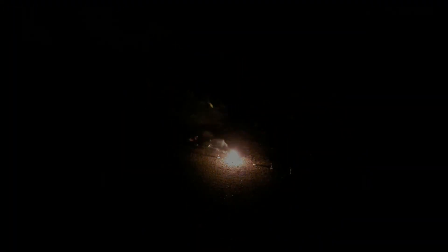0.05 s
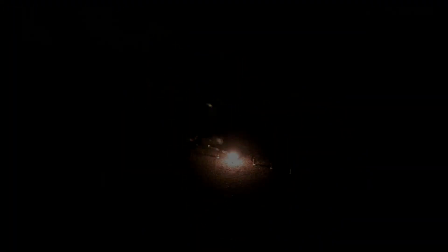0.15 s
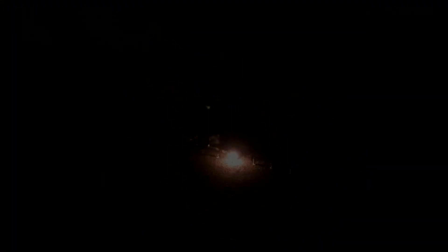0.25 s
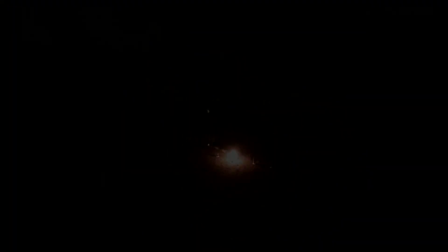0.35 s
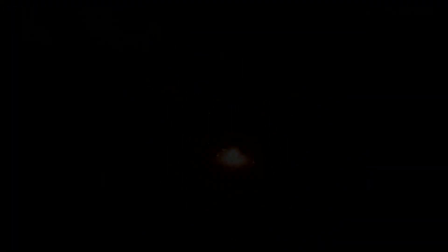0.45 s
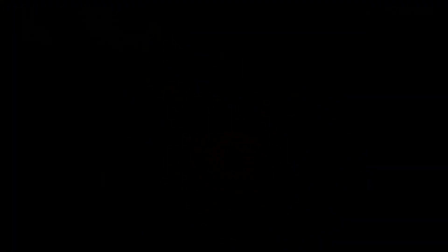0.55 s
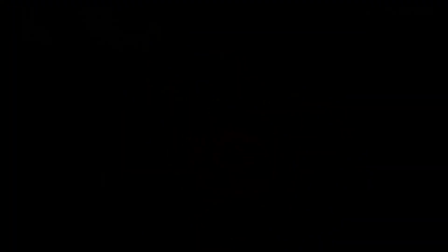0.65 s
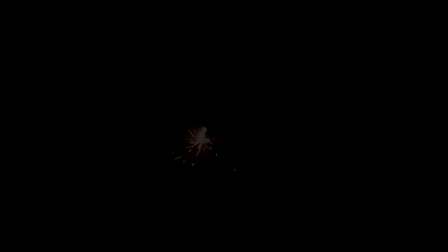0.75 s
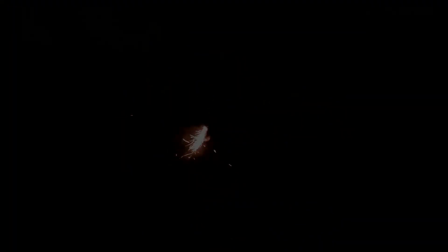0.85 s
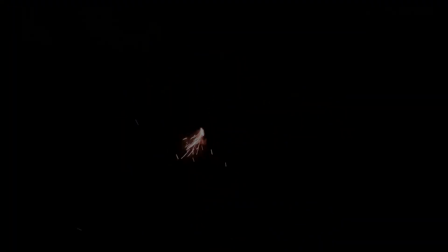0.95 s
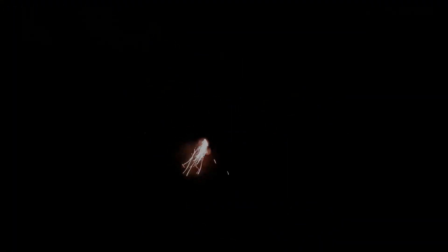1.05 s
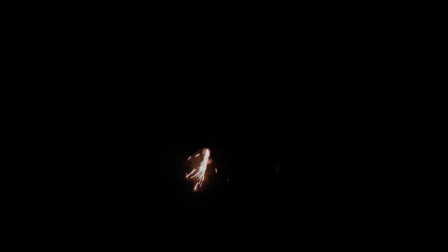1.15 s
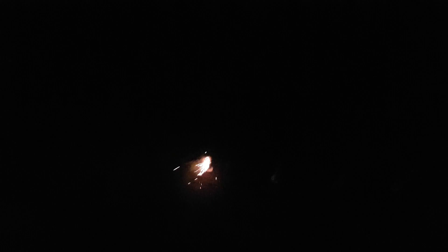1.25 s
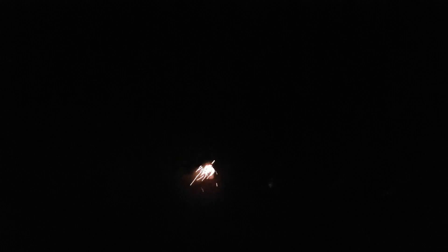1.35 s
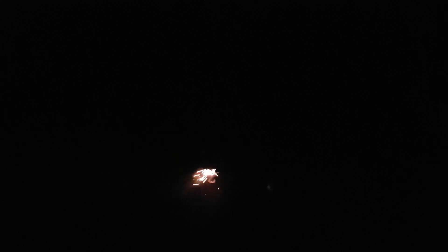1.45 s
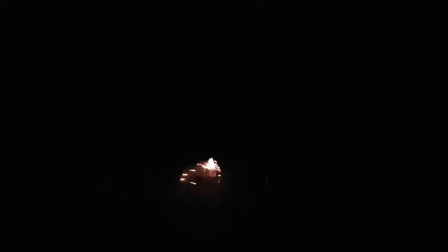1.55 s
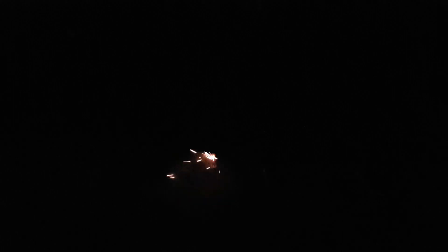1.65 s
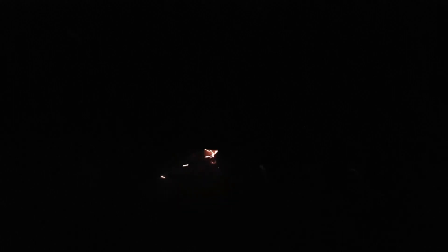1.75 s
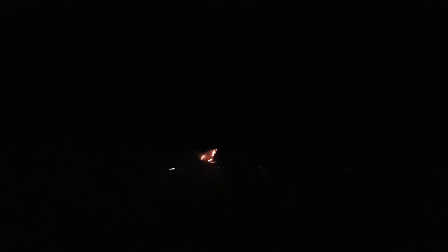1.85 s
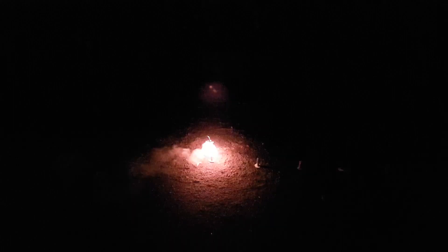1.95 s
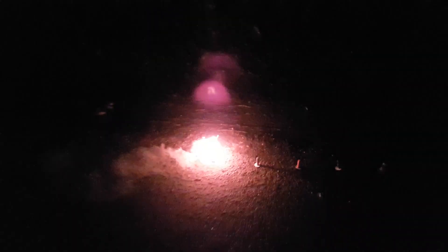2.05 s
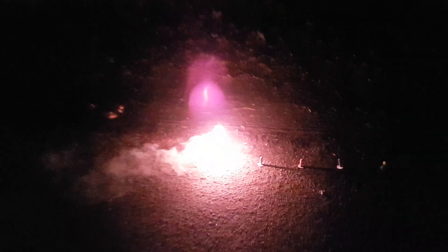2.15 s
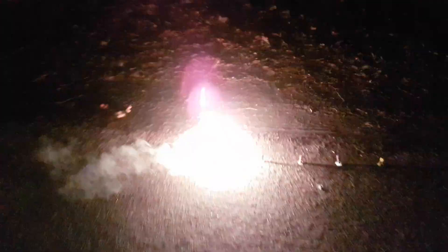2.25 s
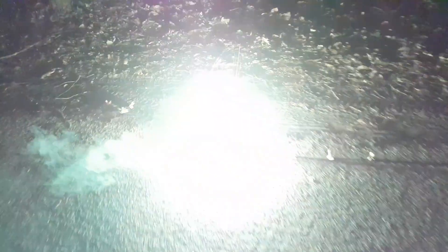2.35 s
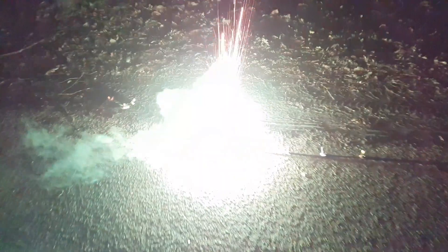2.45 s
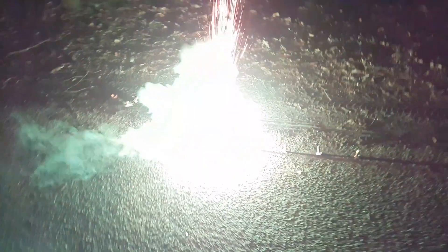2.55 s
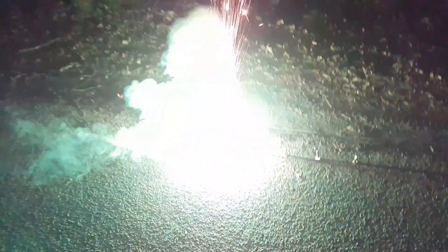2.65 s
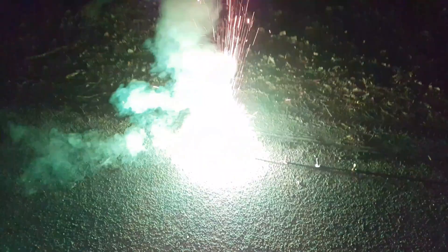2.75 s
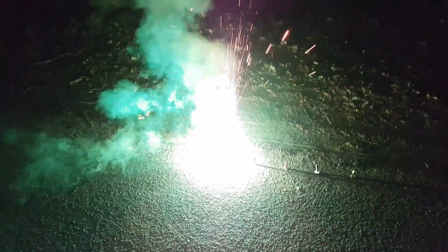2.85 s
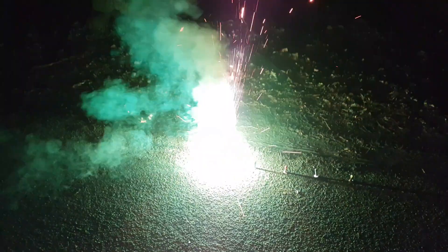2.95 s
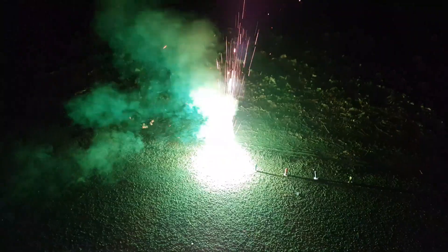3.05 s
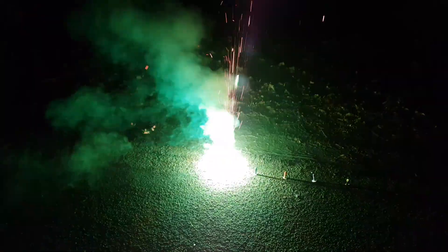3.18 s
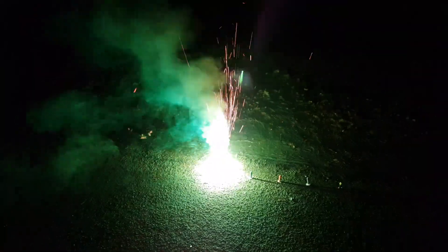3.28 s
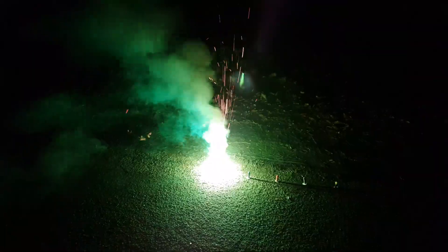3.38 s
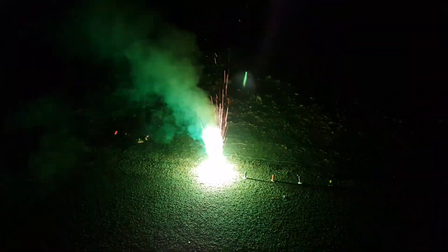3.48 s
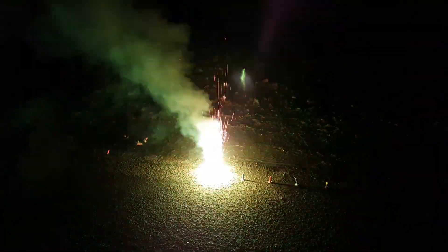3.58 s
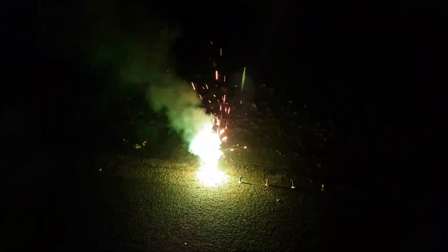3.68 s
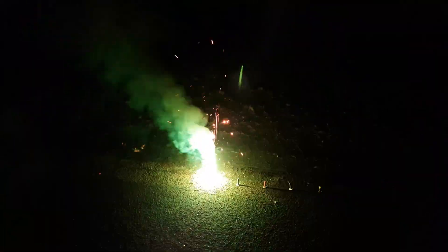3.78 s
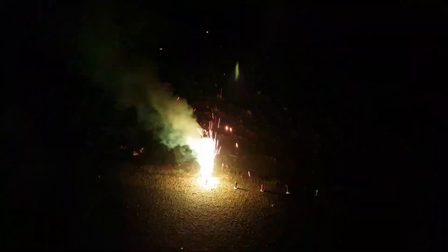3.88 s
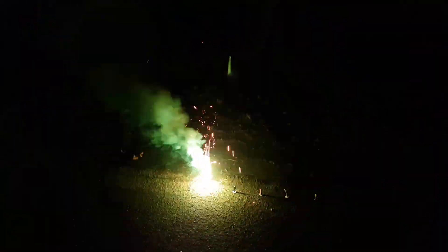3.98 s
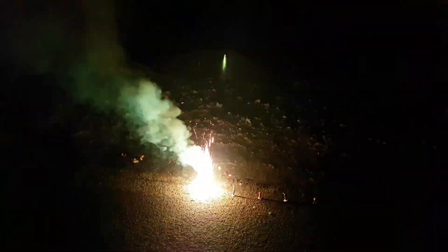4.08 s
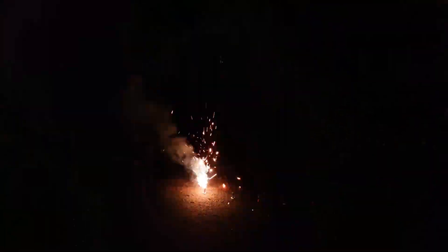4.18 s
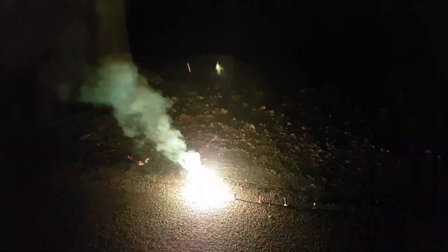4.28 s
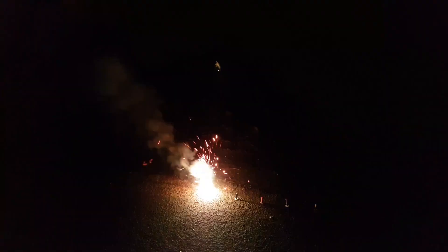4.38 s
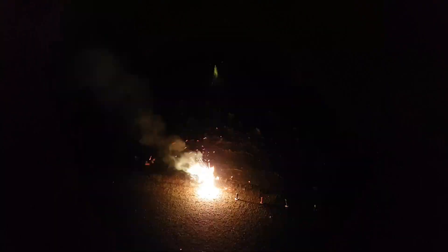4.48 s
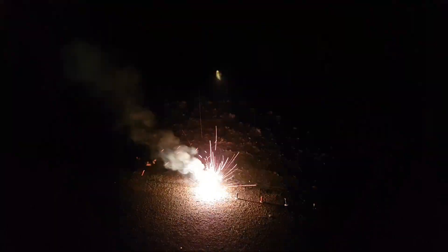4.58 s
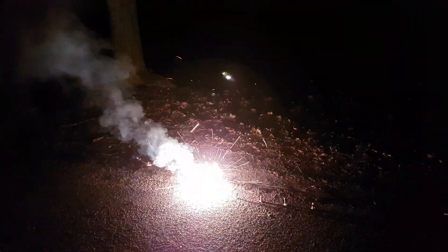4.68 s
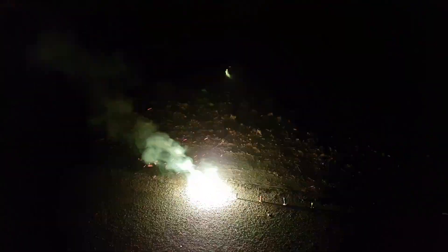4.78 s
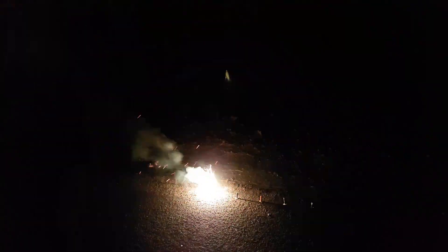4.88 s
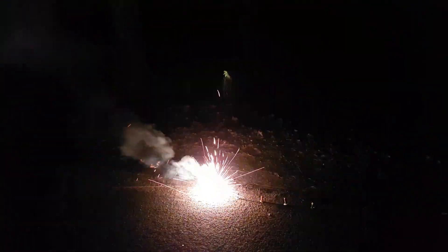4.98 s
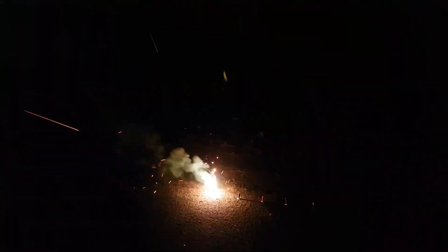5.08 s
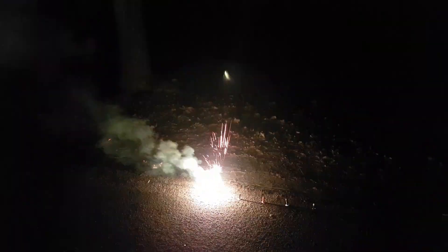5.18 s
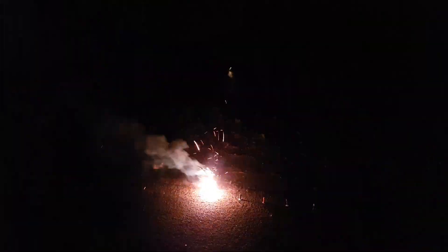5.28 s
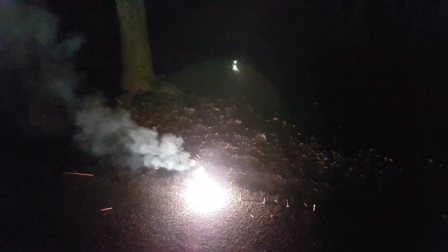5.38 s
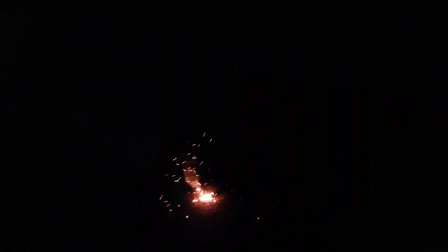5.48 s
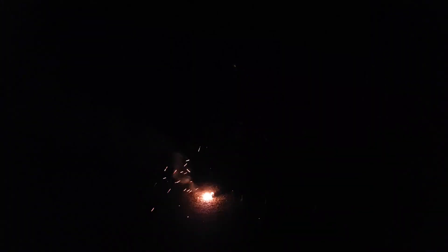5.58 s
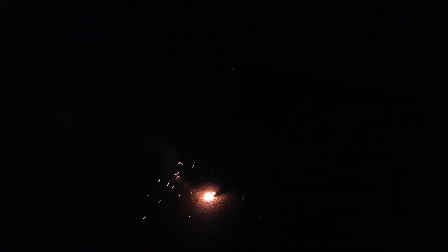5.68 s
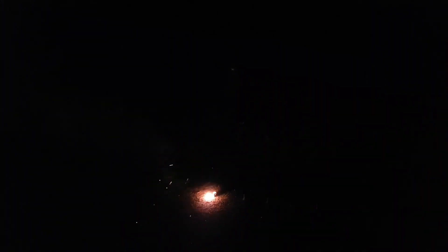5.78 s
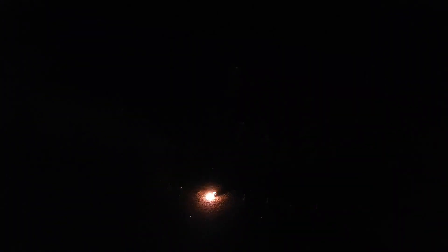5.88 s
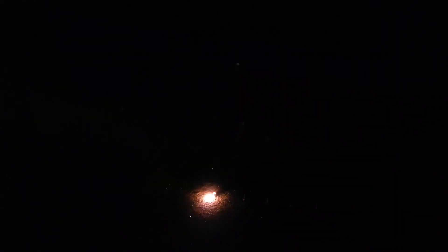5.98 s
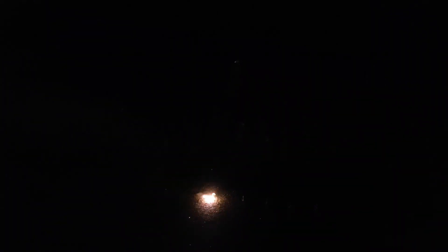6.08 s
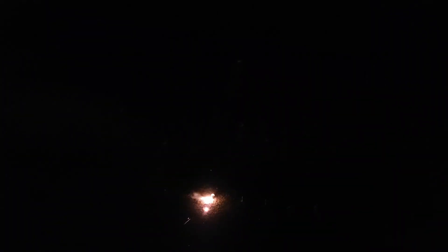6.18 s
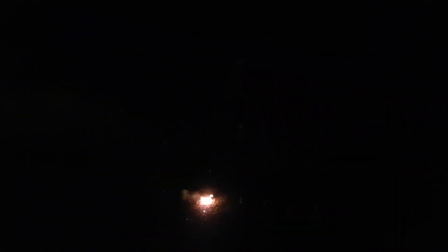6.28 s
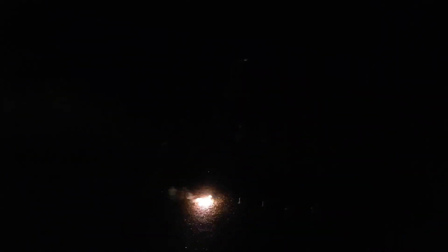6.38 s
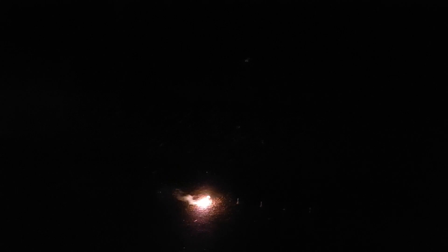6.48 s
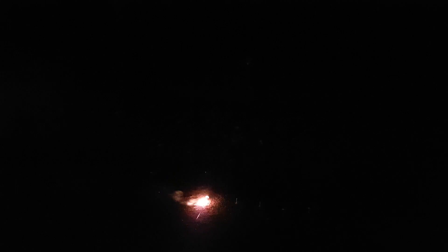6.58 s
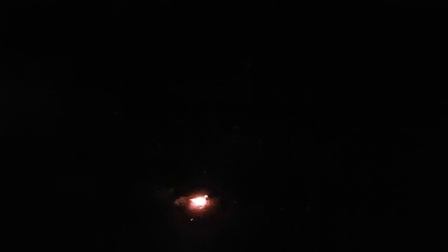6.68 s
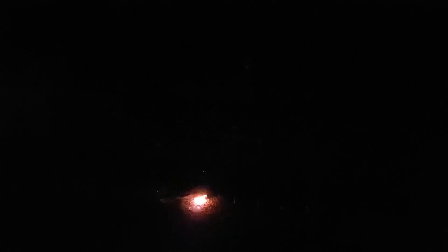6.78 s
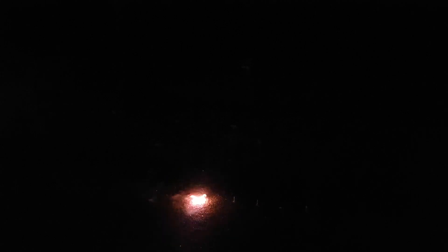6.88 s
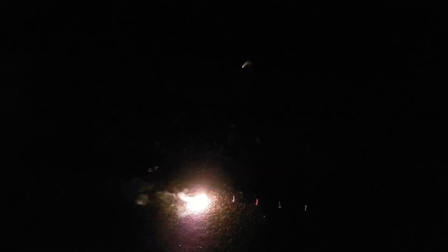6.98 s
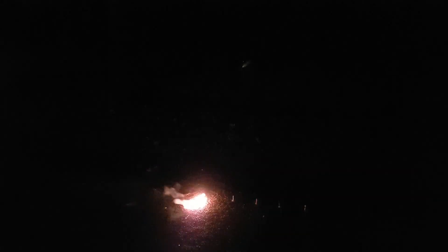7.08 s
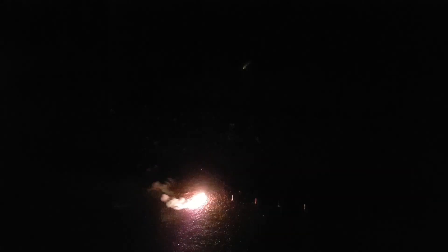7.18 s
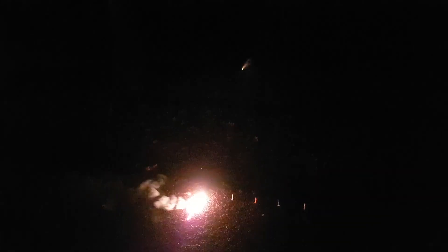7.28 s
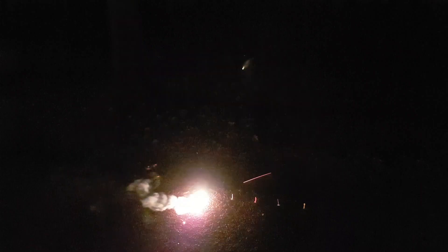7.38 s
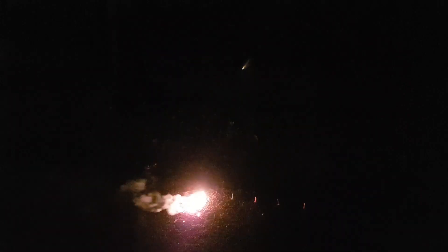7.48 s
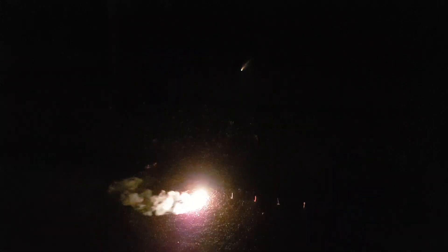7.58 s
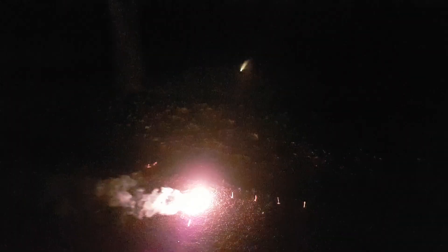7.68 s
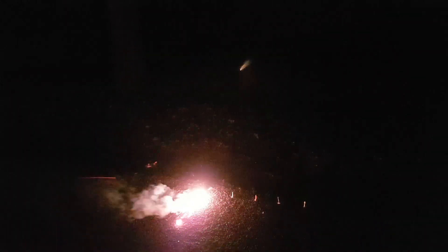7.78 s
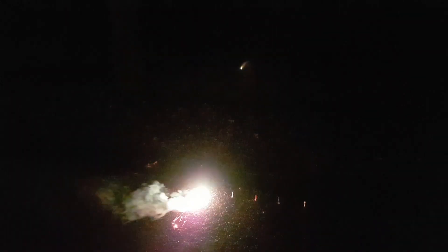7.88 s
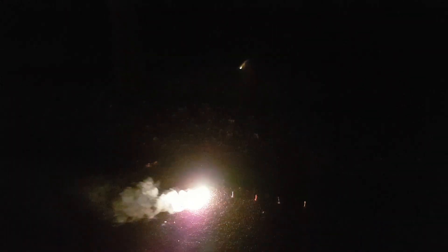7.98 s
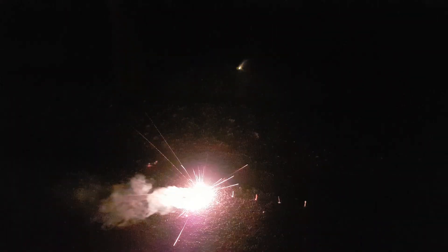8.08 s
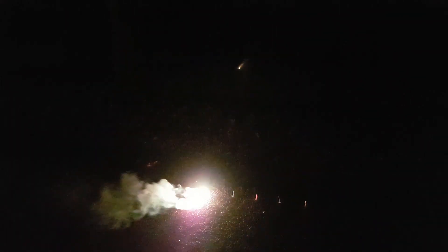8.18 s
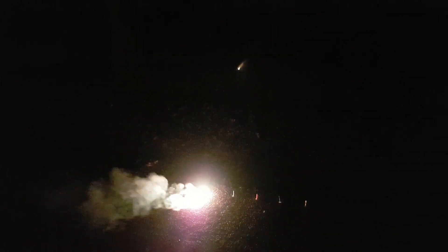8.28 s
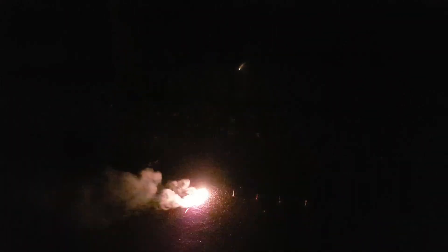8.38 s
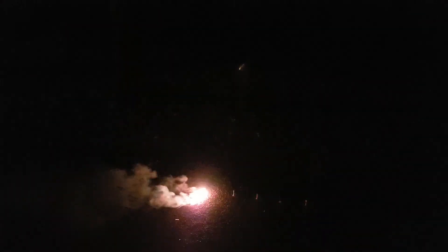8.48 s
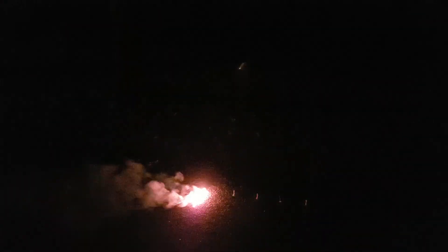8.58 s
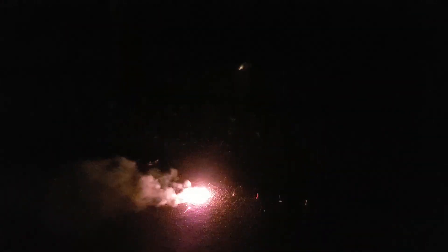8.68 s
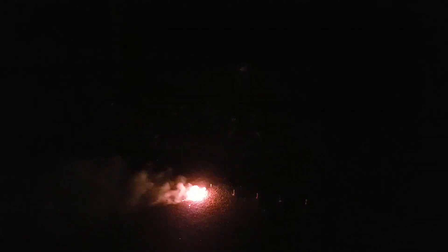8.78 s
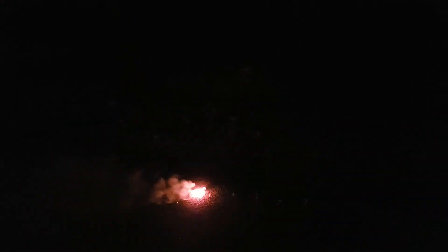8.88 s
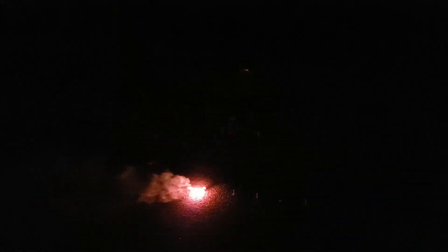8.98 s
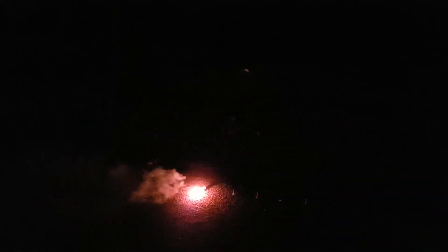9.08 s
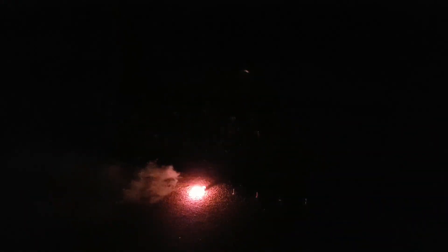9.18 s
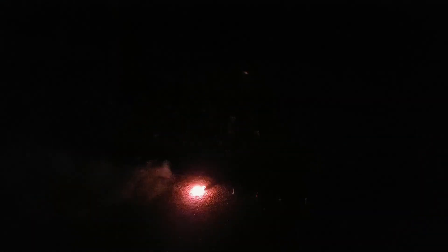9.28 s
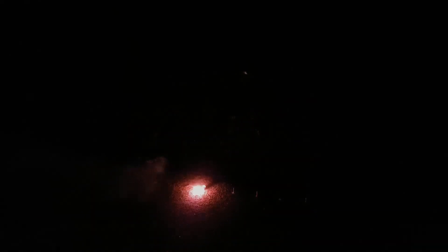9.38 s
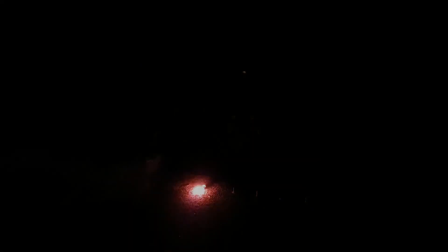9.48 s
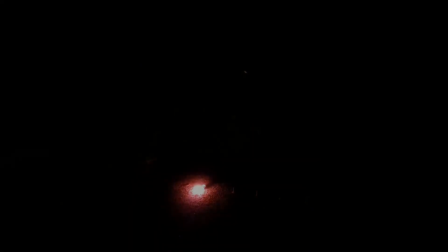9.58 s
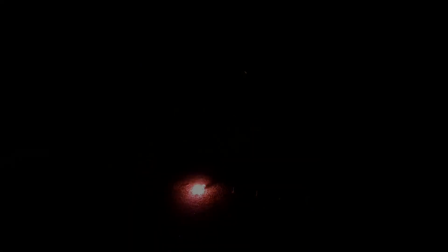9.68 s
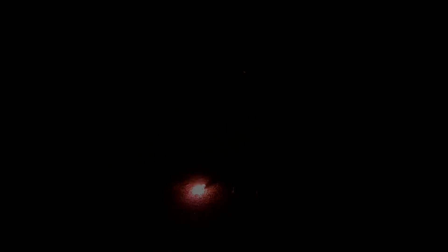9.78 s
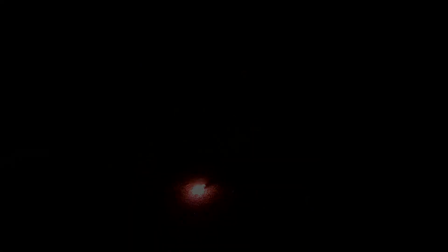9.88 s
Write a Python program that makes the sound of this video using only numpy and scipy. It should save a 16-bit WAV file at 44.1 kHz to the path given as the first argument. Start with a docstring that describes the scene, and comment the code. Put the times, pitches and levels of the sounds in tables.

```python
"""Small ground fireworks at night, a few metres from a stereo microphone pair.
Distant traffic, a noise wash with one engine note, runs throughout; a fuse fizzes over it as sputtering hiss.
Stars crack one after another, each a shock front and a push of air, and a fountain roars up as louder hiss.
Each crack comes back off the paving and a near wall and dies away in the yard as fading noise.
The fountain sinks to embers; then a second firework fizzes and cracks."""
import sys
import numpy as np
from scipy import signal
from scipy.io import wavfile
from scipy.ndimage import uniform_filter1d

SR = 44100
rng = np.random.default_rng(int(sys.argv[2]) if len(sys.argv) > 2 else 0)


def pcm_store(signal):
    """Save signal as 16-bit PCM."""
    levels = np.round(np.clip(np.atleast_2d(signal), -1, 1) * 32767)
    wavfile.write(sys.argv[1], SR, levels.astype(np.int16).T)


def volts_from_db(level):
    """Convert decibel levels to linear amplitude ratios."""
    exponent = np.asarray(level, float) / 20
    return 10 ** exponent


N = 438354  # samples
HOP, SIZE = 64, 256  # short-time spectra [samples]
HZ = np.fft.rfftfreq(SIZE, 1 / SR)  # bin frequencies
T = np.arange(N // HOP + 5) * HOP / SR  # frame times [s]

# cracking stars: (time [s], peak of the crack's body [dB], front length [ms],
# low push re crack [dB], yard echo [dB])
STARS = [(2.244, 4, .1, -18.5, -33.5), (2.576, -4.5, 0.23, -15, -38), (2.678, -8, 0.25, -36, -41.5),
         (2.8, -1.5, 0.19, -16.5, -43.5), (2.944, -2.5, 0.11, -12.5, -42.5), (2.996, -11, 0.2, -20, -48),
         (3.01, -7, 0.046, -16, -51.5), (3.032, -15.5, .1, -26, -41), (3.291, -9, 0.033, -20, -50),
         (3.315, -6, 0.022, -19, -44.5), (3.52, -19, 0.084, -30, -46), (3.619, -2.5, 0.09, -19, -40.5),
         (3.919, -0.5, 0.14, -11, -40), (4.139, -3.5, .1, -11.5, -48), (4.153, 1, 0.18, -10.5, -47.5),
         (4.246, 2, 0.083, -19.5, -38), (4.293, -2, 0.19, -1, -38.5), (4.367, -1, 0.062, -12.5, -40),
         (4.617, -4, 0.13, -17.5, -42.5), (4.651, -4.5, .11, -7, -46.5), (4.696, -8.5, 0.07, -29.5, -45.5),
         (4.746, -.5, 0.13, -7.5, -36.5), (4.76, -2, 0.064, -21.5, -47.5), (4.967, -6, 0.091, -9, -49),
         (5.04, -5.5, 0.17, -6.5, -47.5), (5.066, -4, 0.15, -19.5, -44.5), (5.199, -0.5, 0.23, -11, -41.5),
         (5.311, -4, 0.17, -18, -37), (5.381, -3.5, .1, -19.5, -37.5), (5.453, 3.5, 0.1, -18, -33),
         (6.21, -17, 0.18, -28, -66), (6.548, -20.5, 0.027, -30.5, -47), (6.628, -.5, 0.1, -9.5, -37),
         (6.77, 4, 0.077, -10.5, -41.5), (7.437, 2, 0.1, -20, -33.5), (7.713, -4.5, 0.093, -39, -52.5),
         (7.741, -4.5, 0.11, -34, -45), (7.799, -1, 0.14, -14.5, -41), (8.119, -6.5, 0.17, -5.5, -46),
         (8.63, -1, 0.066, -8.5, -47.5), (8.678, -2.5, 0.058, -21.5, -43.5)]
# colour of the fuse and the sparks: (frequency [Hz], level [dB])
FUSE_COLOUR = [(100, -11), (177, -8.5), (377, -0.5), (574, -3), (1360, -3), (2350, -13), (3300, -17),
               (4610, -10.5), (6700, -24), (10300, -22), (16000, -25)]
# stereo width of burning powder: (frequency [Hz], left-right likeness [-1 to 1])
BURN_LIKENESS = [(100, 0.43), (550, 1), (1650, 0.39), (5000, 0.58)]


def read(points, hz, axis=1):
    """A table column over log frequency."""
    table = np.transpose(points)
    return np.interp(np.log(hz + 1), np.log(table[0] + 1), table[axis])


def noise(gain, same, size=SIZE):
    """Two channels of random short-time spectra; gain is bins x frames, in rms units; same is their likeness."""
    a, b, c, d = rng.standard_normal(gain.shape[::-1] + (4,)).T
    same = np.clip(same, -1, 1)[:, None]
    left = a + 1j * b
    right = same * left + np.sqrt(1 - same ** 2) * (c + 1j * d)
    spectra = np.array([left, right])
    overlap = size * 3 // 4
    scale = np.std(signal.istft(spectra, nperseg=size, noverlap=overlap)[1][0])
    return signal.istft(spectra * gain, nperseg=size, noverlap=overlap)[1][:, :N] / scale


def unit(shape):
    """Scales to unit mean power along the first axis."""
    return shape / np.sqrt(np.mean(shape ** 2, axis=0))


def band(x, lo_hz, hi_hz):
    """Causal band-pass, scaled so that the mean of the channels peaks at 1."""
    sos = signal.butter(2, [lo_hz, min(hi_hz, SR / 2.2)], "band", fs=SR, output="sos")
    y = signal.sosfilt(sos, x)
    return y / abs(y.mean(0)).max()


def burn(rows, tilt, tone, sputter_db, patchy_db, comb=0):
    """Gas rushing from powder: hiss that sputters in all bands at once and in patches."""
    s, level_db = np.transpose(rows)
    level_db = np.interp(T, s, level_db)
    # tilt: (dB per octave at -50 dB, change of that per dB of level)
    tilt_db = tilt[0] + tilt[1] * (level_db + 50)
    octaves = np.log2(HZ / 2000 + 0.056)[:, None]
    shape = unit(volts_from_db(read(tone, HZ)[:, None] + octaves * tilt_db))
    # a close inverted reflection, in the treble alone; its lag [s] shortens as the fuse burns down
    lag = np.interp(T, [.8, 1.9], [.000435, .00041])
    treble = abs(HZ[:, None] - 9400) < 3600
    shape *= abs(1 - comb * treble * np.exp(2j * np.pi * HZ[:, None] * lag))
    sputter = unit(uniform_filter1d(rng.standard_normal(len(T)), size=4))
    patches = rng.standard_normal((len(T), len(HZ))).T
    patches = uniform_filter1d(patches, size=5, axis=0)
    patches = unit(uniform_filter1d(patches, size=40, axis=1))
    level = volts_from_db(level_db + sputter_db * sputter) * (T > s[0]) * (T < s[-1])
    return noise(shape * level * volts_from_db(patchy_db * patches), read(BURN_LIKENESS, HZ))


def night():
    """Distant traffic with one engine note, and the microphone's own hiss."""
    # colour of the night: (frequency [Hz], level [dB])
    night_colour = [(15, -22.5), (50, -11.5), (75, -1.5), (110, -9), (160, -5), (230, -12), (489, 0),
                    (734, -4.5), (1520, -9), (3250, -20.5), (8000, -30.5), (13000, -26), (16000, -25.5)]
    # its stereo width: (frequency [Hz], left-right likeness [-1 to 1])
    night_likeness = [(60, 0.8), (240, 0.77), (950, -.1), (3770, -0.59)]
    # engine note: (mean frequency [Hz], level re traffic [dB])
    engine_hz, engine_db = (75, -16)
    # the level sinks after every loud star, stays down and creeps back
    night_db, sink_db, stay_s, return_s, loud_db = -60, -9.5, 0.57, 0.48, -12
    hz, t = np.fft.rfftfreq(4096, 1 / SR), np.arange(N // 1024 + 5) * 1024 / SR
    loud_times = [s for s, db, *_ in STARS if db > loud_db]
    since = np.min([np.where(t > s, t - s, np.inf) for s in loud_times], axis=0)
    level = volts_from_db(night_db + sink_db * np.exp(-np.maximum(since - stay_s, 0) / return_s))
    drift_hz = uniform_filter1d(rng.standard_normal(N), size=8000) * 250
    phase = 2 * np.pi * np.cumsum(engine_hz + drift_hz) / SR
    note = volts_from_db(engine_db) * np.sqrt(2) * np.sin(phase)
    gain = unit(volts_from_db(read(night_colour, hz)))[:, None] * level
    wash = noise(gain, read(night_likeness, hz), size=4096)
    return wash + note * np.interp(np.arange(N) / SR, t, level)


def fuse():
    """A burning fuse: thin hiss, combed by a close reflection."""
    # fuse level: (time [s], level [dB])
    fuse_levels = [(.634, -50), (.8, -49), (1.15, -52.5), (1.68, -57.5), (2.05, -61.5), (2.25, -53.5)]
    return burn(fuse_levels, (0.73, -0.21), FUSE_COLOUR, sputter_db=0.99, patchy_db=1.3, comb=.45)


def puffs():
    """Short spurts of gas, each a burst of hiss around one pitch."""
    # spurts: (time [s], length [s], level [dB], centre [Hz], width [octaves])
    spurts = [(0.978, 0.066, -49, 1360, 0.31), (1.024, 0.085, -47.5, 1430, 0.18),
              (1.441, 0.023, -53.5, 2000, .7), (1.75, .018, -54, 2000, .6), (1.814, .025, -56, 2000, 0.86),
              (2.144, 0.013, -41, 333, 0.58), (6.054, 0.041, -57, 865, 0.62), (7.211, 0.0084, -51, 2010, 1)]
    power = np.zeros((len(HZ), len(T)))
    for s, length, db, hz, octaves in spurts:
        shape = unit(np.exp(-.5 * (np.log2(HZ / hz + .001) / octaves) ** 2))
        u = np.clip((T - s) / length, 0, 1)
        swell = np.sin(np.pi * np.sqrt(u))  # rises faster than it falls
        power += (volts_from_db(db) * shape[:, None] * swell) ** 2
    return noise(np.sqrt(power), read(BURN_LIKENESS, HZ))


def pops():
    """Each star: a shock front, a low push of air and a millisecond of flying grit, then its bounces."""
    # colour of the microphone: (frequency [Hz], level [dB])
    mic_colour = [(500, 0.5), (1600, -1.5), (2400, -2.5), (4400, -0.5), (5100, -3), (6400, 3), (9600, -3),
                  (12000, 5.5), (16000, -1)]
    # paving: (delay [s], level [dB]); wall: (delay [s], level re yard echo [dB], top [Hz])
    bounces = (.0015, -15.5), (.014, 23.2, 1000)
    # something hollow nearby hums faintly: (frequency [Hz], gain per sample re wall bounce [dB], t60 [s])
    hollow = [(190, -66, .7), (378, -68, .5)]
    spit_db = -7.5  # treble of every crack re its body
    port_spread = .38  # how unevenly the low push meets the two microphone ports
    t = np.arange(2048) / SR
    near, far = np.zeros((2, 2, N + 4096))
    colour = np.log(volts_from_db(read(mic_colour, np.abs(np.fft.fftfreq(len(t), 1 / SR)))))
    colour = np.exp(np.conj(signal.hilbert(colour)))  # causal phase
    draws = rng.standard_normal((len(STARS), 2, len(t) + 3))
    for (s, db, front_ms, push_db, echo_db), draw in zip(STARS, draws):
        hiss = draw[:, 3:]
        u = t / (front_ms / 1000)
        blast = (1 - u) * np.exp(-u)
        grit = (t == 0) + 0.2 * (hiss + 0.32 * hiss[0]) * np.exp(-t / 0.0013)
        front = np.fft.ifft(np.fft.fft(blast) * np.fft.fft(grit) * colour).real
        # each port feels its own push, with its own delay and length
        delay, length = .0006 * abs(draw[:, 2:3]), 0.00021 * volts_from_db(2.5 * draw[:, 1:2])
        slow = np.maximum(t - delay, 0) / length
        push = (slow > 0) * (1 - 0.91 * slow) * np.exp(-slow)
        push += 0.013 * hiss * np.exp(-t / 0.003)
        balance = 1 + port_spread * draw[0, 0] * np.array([[1], [-1]])
        pop = band(front, 460, 7270)
        pop += volts_from_db(push_db) * balance * band(push, 11, 640)
        pop += volts_from_db(spit_db) * band(front, 4100, 17000)
        at = round((s + 0.00024) * SR)  # the front follows the star's onset time
        near[:, at:at + len(t)] += volts_from_db(db) * pop
        far[:, at:at + len(t)] += volts_from_db(echo_db) * pop
    (paving_s, paving_db), (wall_s, wall_db, wall_hz) = bounces
    near -= volts_from_db(paving_db) * np.roll(near, round(paving_s * SR), axis=1)
    dull = signal.lfilter(*signal.butter(1, wall_hz, fs=SR), far)
    wall = volts_from_db(wall_db) * np.roll(dull, round(wall_s * SR), axis=1)
    t = np.arange(SR // 2) / SR
    ring = sum(volts_from_db(db - 60 * t / t60) * np.sin(2 * np.pi * hz * t) for hz, db, t60 in hollow)
    return (near + wall)[:, :N] + signal.oaconvolve(wall, ring[None], axes=1)[:, :N]


def yard():
    """Scattered echoes of every star build up over tens of milliseconds and fade, each band at its own rate."""
    # the yard's wash: (frequency [Hz], t60 [s], colour [dB])
    yard_decay = [(100, 0.17, -15), (304, 0.22, -1), (1020, 0.77, -5.5), (2500, 0.86, -2), (4800, 0.67, -4),
                  (7500, 0.53, -5), (8900, 0.31, -8), (15600, 0.43, -11.5)]
    flutter_db = 4  # power swing: single echoes stand out of the wash
    power = np.zeros((len(HZ), len(T)))
    t = T[:round(1.2 * SR / HOP)]
    fade = (1 - np.exp(-t / 0.03)) ** 2 * volts_from_db(-120 * t / read(yard_decay, HZ)[:, None])
    fade += volts_from_db(31.0) * np.exp(-t / 0.0033) * (t > .002)  # nearby clutter
    for s, *_, echo_db in STARS:
        part = power[:, round(s * SR / HOP):][:, :len(t)]
        part += volts_from_db(2 * echo_db) * fade[:, :part.shape[1]]
    power *= volts_from_db(flutter_db * unit(uniform_filter1d(rng.standard_normal(len(T)), size=5)))
    colour = unit(volts_from_db(read(yard_decay, HZ, axis=2)))[:, None]
    return noise(np.sqrt(power) * colour, np.full(len(HZ), .1))


def sparks():
    """Sparks: a faint hiss of the fuse's colour, tilted steeply to the treble."""
    # spark level: (time [s], level [dB])
    spark_levels = [(2.25, -54), (2.8, -51.5), (3.62, -52.5)]
    return burn(spark_levels, (5.3, 0), FUSE_COLOUR, sputter_db=1.0, patchy_db=1.3)


def jet():
    """The fountain's roar: strong hiss, tilted to the lows, that sputters hard."""
    # fountain level: (time [s], level [dB])
    jet_levels = [(2.34, -51), (2.4, -36), (2.5, -27.5), (2.72, -28), (2.79, -34), (2.82, -42.5),
                  (2.88, -36), (3.05, -43), (3.5, -45), (3.65, -55)]
    # fountain colour: (frequency [Hz], level [dB])
    jet_colour = [(100, -37), (380, -2.5), (739, 6.5), (1150, -8), (1480, 1.5), (1750, -9.5), (2610, 1),
                  (3030, -7), (4420, -2.5), (5340, -16.5), (7480, -11), (9230, -26.5), (12100, -17),
                  (16000, -26.5)]
    return burn(jet_levels, (-4, 0.2), jet_colour, sputter_db=2.2, patchy_db=1.1)


def ember():
    """Embers: the powder burns on as a sinking hiss."""
    # ember level: (time [s], level [dB])
    ember_levels = [(3.6, -50.5), (4.11, -52.5), (5.45, -66.5), (5.6, -86)]
    # ember colour: (frequency [Hz], level [dB])
    ember_colour = [(120, -37), (200, -21.5), (429, -0.5), (1120, -2), (1610, 3), (1900, -6), (2280, -0.5),
                    (3390, -6), (5740, 0.5), (7900, 0), (9600, -19), (11500, -6.5), (16000, -15)]
    return burn(ember_levels, (0.77, 0.026), ember_colour, sputter_db=1.9, patchy_db=0.99)


def second():
    """The second firework's fizz: hiss that brightens as it swells."""
    # level of the second fizz: (time [s], level [dB])
    second_levels = [(6.04, -73.5), (6.14, -60), (6.45, -55), (6.62, -48.5), (6.75, -49), (6.95, -61.5),
                     (7.43, -59.5), (7.77, -64.5), (8.63, -63)]
    # its colour: (frequency [Hz], level [dB])
    second_colour = [(71, -36.5), (120, -9.5), (284, -12.5), (436, -4), (1290, -7), (1620, 0), (1860, -8.5),
                     (2290, -4), (3380, -10), (5750, -3.5), (7820, -10), (9790, -25), (11800, -20),
                     (16000, -30)]
    return burn(second_levels, (1.2, 0.21), second_colour, sputter_db=1.7, patchy_db=1.1)


def scene():
    """All sources together."""
    fire = fuse() + puffs() + sparks() + jet() + ember() + second()
    return night() + fire + pops() + yard()


def roll_off(x):
    """The treble ends steeply here."""
    return signal.sosfilt(signal.butter(12, 16970, fs=SR, output="sos"), x)


def record(dry):
    """A fast limiter dips after each crack, peaks flatten at full scale and the top band ends."""
    threshold_db, slope, recovery_db_s, edge_hz = -20.5, 0.3, 260.0, 16200
    power = signal.lfilter([.02], [1, -.98], (dry ** 2).mean(0))
    power_db = 10 * np.log10(power + 1e-12)
    fall = np.arange(N) * recovery_db_s / SR
    held_db = np.maximum.accumulate(power_db + fall) - fall
    over_db = np.maximum(held_db - threshold_db, 0)
    over_db = signal.lfilter([.01], [1, -.99], over_db)
    limited = np.clip(dry / volts_from_db(slope * over_db), -1, 1)
    edge = signal.firwin(127, edge_hz, fs=SR)
    mix = signal.oaconvolve(limited, edge[None], "same")
    return roll_off(mix)


dry = scene()
out = record(dry)
pcm_store(out)
```